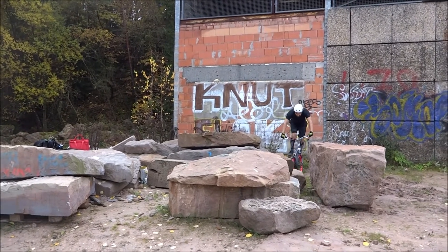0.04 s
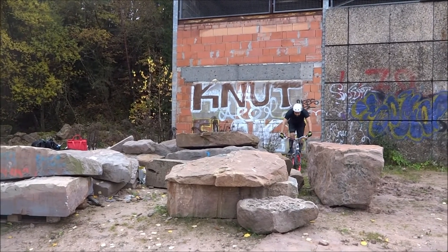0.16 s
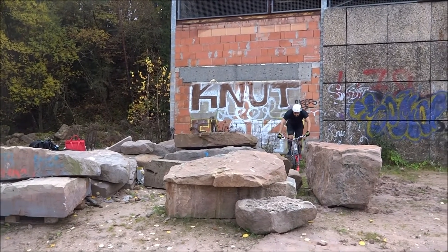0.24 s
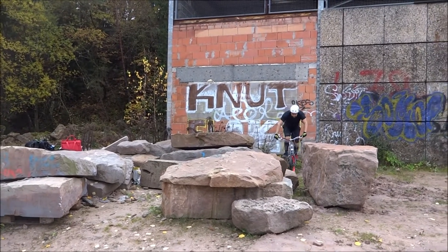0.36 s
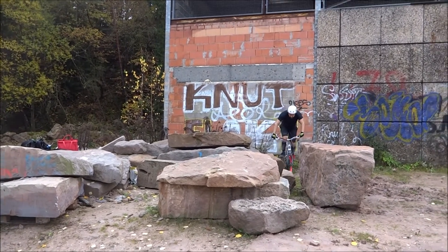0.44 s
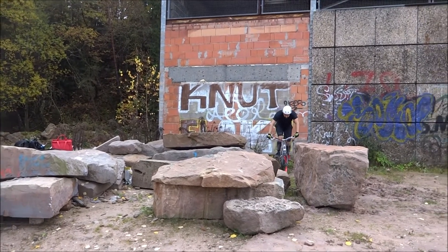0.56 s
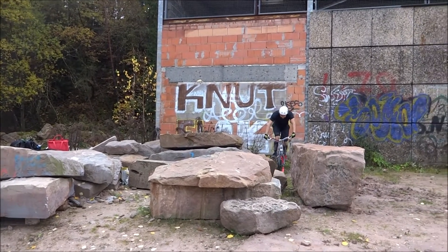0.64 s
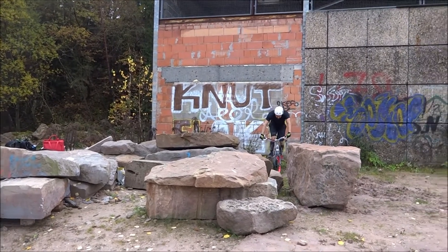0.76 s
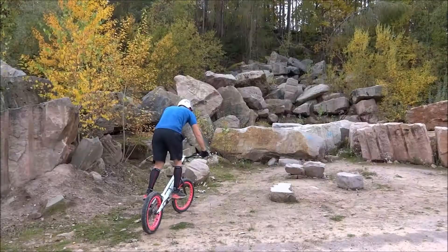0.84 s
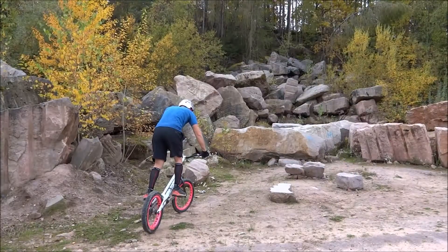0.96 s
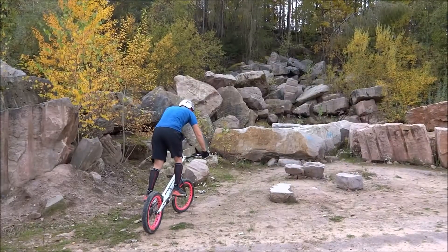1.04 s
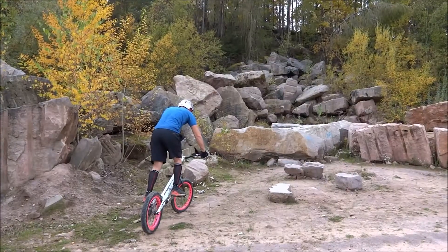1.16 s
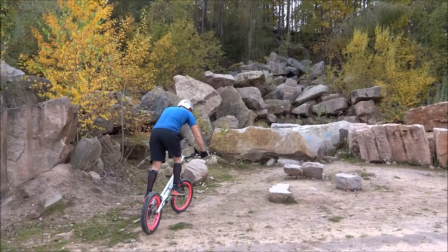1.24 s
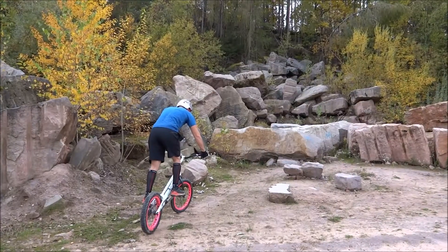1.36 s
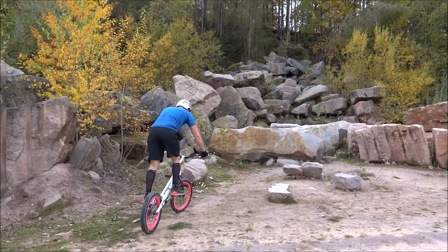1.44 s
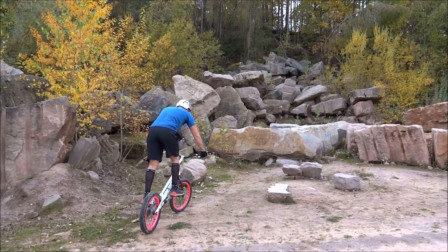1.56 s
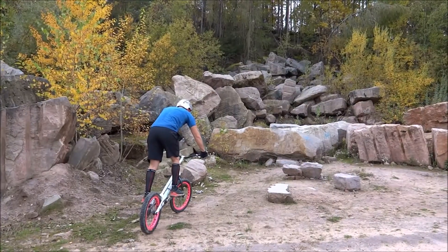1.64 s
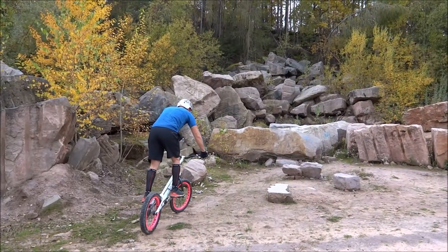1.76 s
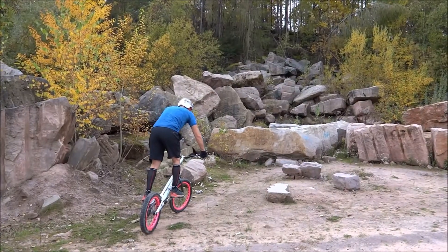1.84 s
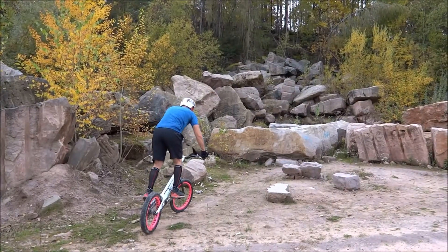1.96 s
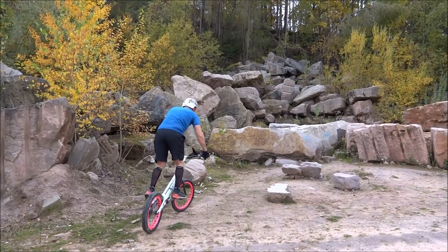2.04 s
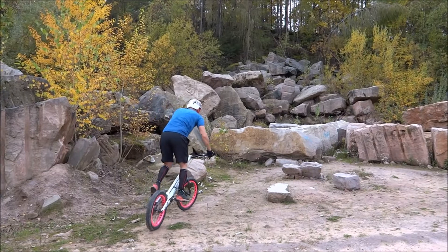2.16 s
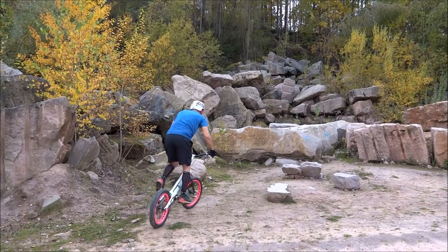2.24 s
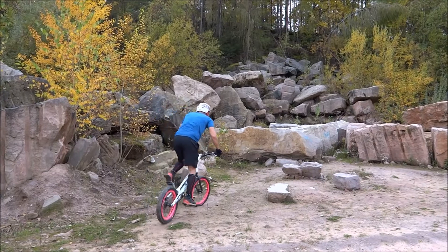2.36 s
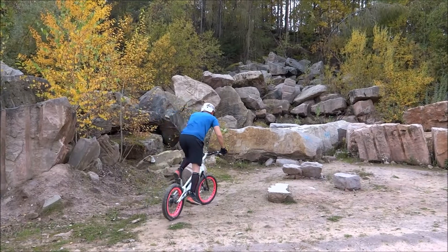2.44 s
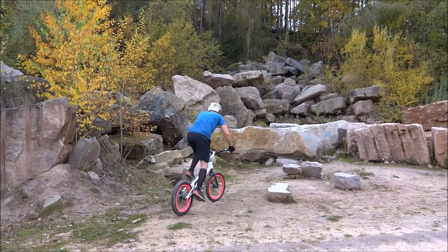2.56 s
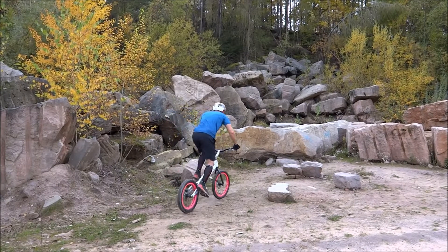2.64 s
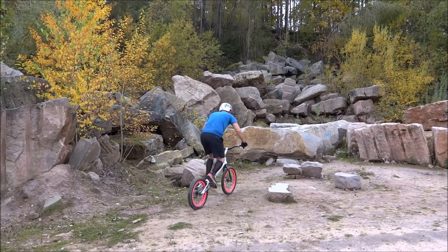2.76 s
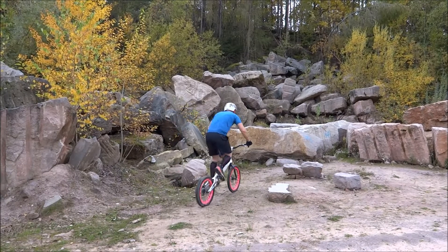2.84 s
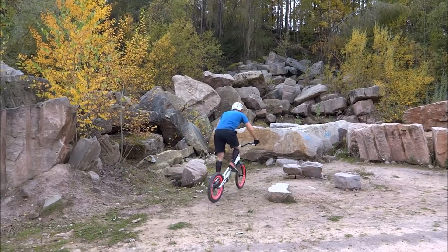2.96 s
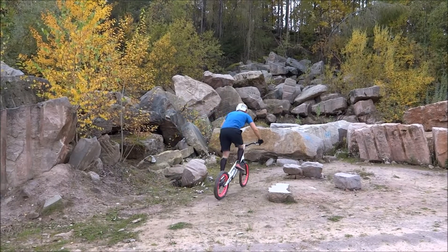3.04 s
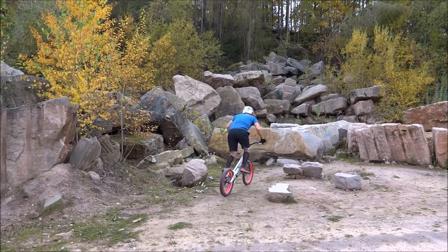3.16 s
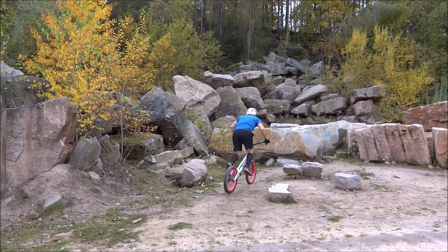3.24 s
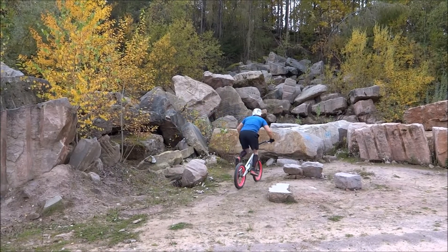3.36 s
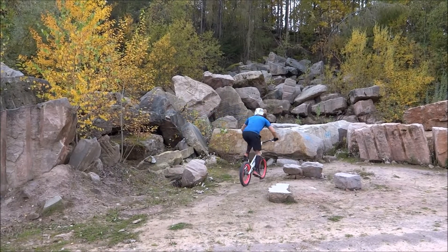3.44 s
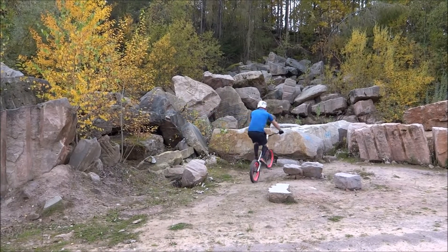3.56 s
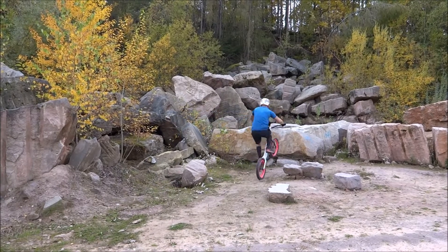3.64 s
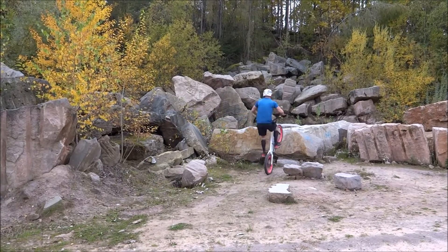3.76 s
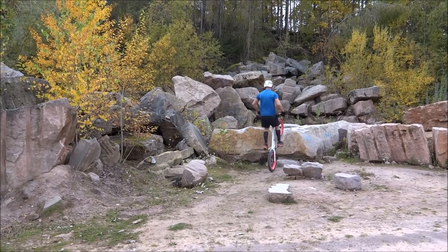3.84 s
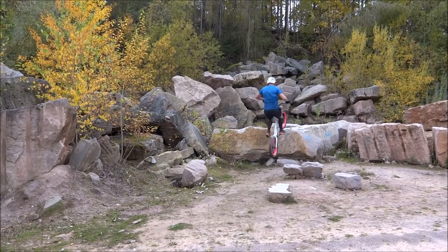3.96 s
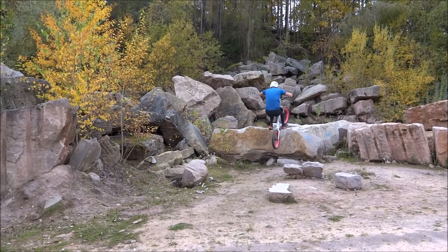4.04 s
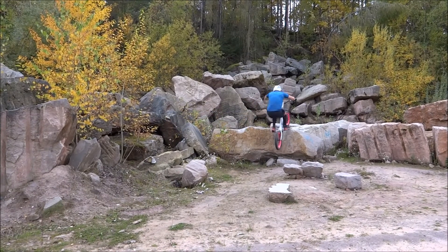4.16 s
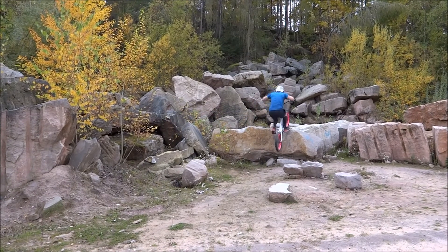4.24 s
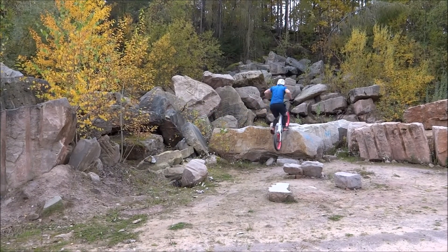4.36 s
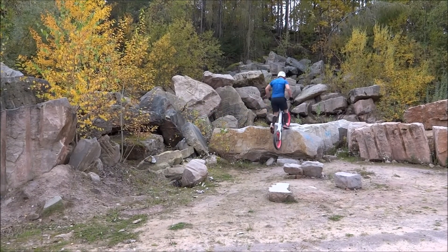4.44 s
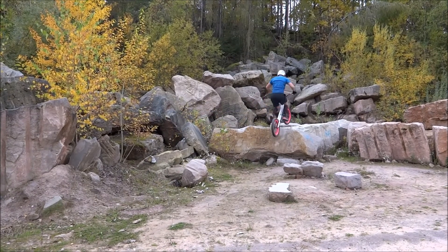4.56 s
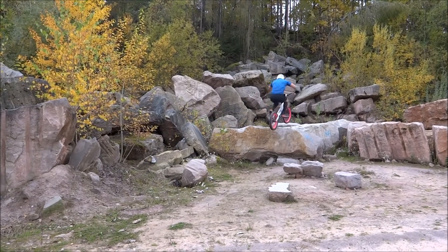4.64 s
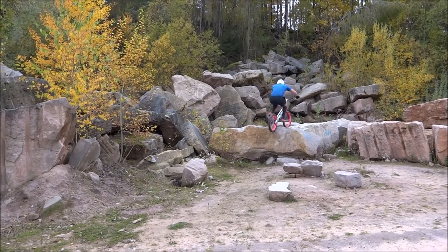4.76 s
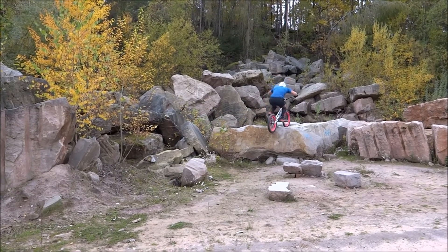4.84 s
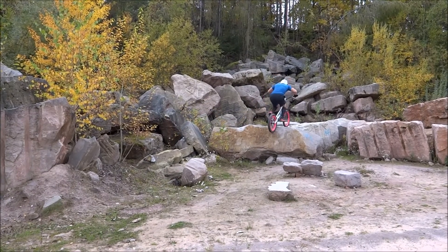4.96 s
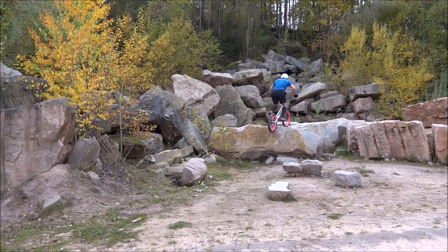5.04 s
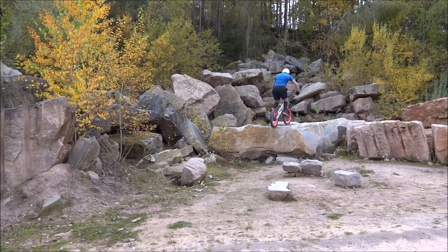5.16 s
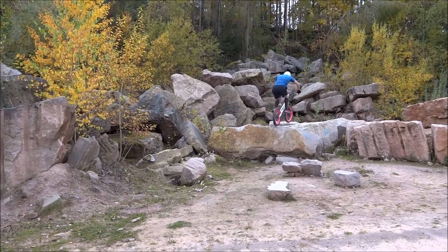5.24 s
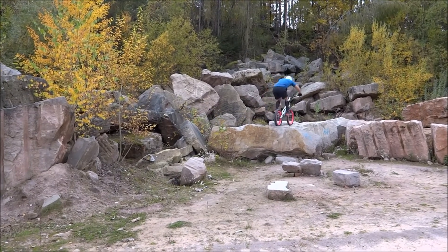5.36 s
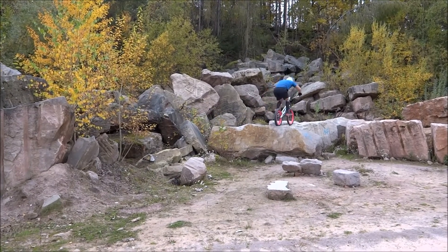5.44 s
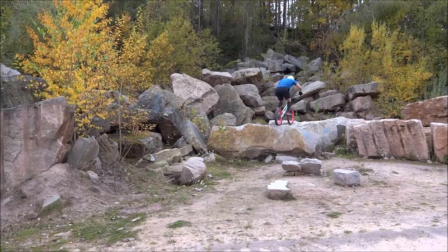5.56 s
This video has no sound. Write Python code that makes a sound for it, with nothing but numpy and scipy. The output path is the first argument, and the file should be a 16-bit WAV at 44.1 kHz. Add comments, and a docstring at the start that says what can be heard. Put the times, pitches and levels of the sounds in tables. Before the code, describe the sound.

Outdoors among rock faces, a trials bike balances with faint grit and sharp, bright freewheel clicks. It rolls off with crunching, hissing tyres, a few light knocks and a ratcheting buzz, then hits a stone block in a dense, loud clatter with low thuds. Two smaller landings follow with scuffs and clicks. Close stereo microphone, light wind, short stony echo.

```python
"""Trials bicycle in a quarry

Close in front of a stereo microphone a bike balances, rolls over grit and hops onto a stone block. Pawls tick
in the hub, frame and chain knock: swarms of tiny contacts ringing resonances. Tyres crunch and hiss as coloured
grains over a low noise rumble, and thud as decaying low sines; a brief hum is a gliding sine. Light wind and
far rumble are shaped noise; the rock faces return a short wash, the microphone housing cuts a row of dips."""
import sys
import numpy as np
from scipy import signal
from scipy.fft import rfft, irfft, next_fast_len
from scipy.io import wavfile

SR = 44100
rng = np.random.default_rng(int(sys.argv[2]) if len(sys.argv) > 2 else 0)


def makeup_ratio(level_db):
    """Linear amplitude ratio for a level in decibels (20 dB per factor of ten)."""
    decades = np.asarray(level_db, float) / 20
    return 10 ** decades


def transcribe(u):
    """Save the signal u as a 16-bit wav file named by the first command-line argument.

    u: samples, shape (n,) or (channels, n), limited to [-1, 1]; the rate is SR.
    q: integer samples, one column per channel.
    """
    v = np.clip(np.atleast_2d(u).T, -1, 1)
    q = np.round(v * 32767).astype(np.int16)
    wavfile.write(sys.argv[1], SR, q)


N = 247401
PADDED = next_fast_len(N + SR)   # room for echoes to end

# wind buffeting the bass: (time [s], level [dB])
WIND = [(0.0, -47), (1.2, -55), (3.1, -56.5), (3.34, -48), (4.48, -54.5), (4.92, -49.5), (5.61, -58)]
# far rumble and leaves: (frequency [Hz], density [dB per Hz])
AIR = [(15, -44), (25, -3), (137, -11), (166, -12), (195, -20), (373, -10.5), (988, -12.5), (1230, -14),
       (2000, -16.5), (2480, -22.5), (4030, -25.5), (16000, -42)]
AIR_DB = -44
# how alike the air is left and right: (frequency [Hz], correlation [0 to 1])
LIKENESS = [(60, 1), (180, 0.5), (550, 0), (4970, 0), (15000, 0.91)]

# thrum of the tyre knobs: (frequency [Hz], density [dB per Hz])
THRUM = [(350, -9.5), (600, -4), (900, 5.5), (1500, -2.5), (2300, -4), (3500, -36)]
# grit cracking under the knobs: (frequency [Hz], density [dB per Hz])
CRUNCH = [(900, -7), (1500, -2.5), (2100, 3), (2500, 3.5), (2900, 2.5), (3400, -0.5), (4500, -8.5),
          (7000, -5.5), (10000, -21.5)]
# hiss of fine sand: (frequency [Hz], density [dB per Hz])
SAND = [(2500, -15), (4000, 7), (5500, 5.5), (6500, 3), (7500, 0), (12000, -3), (16000, -10.5)]
# colour of the low rumble: (frequency [Hz], density [dB per Hz])
RUMBLE = [(70, -8), (135, 1), (200, -2.5), (285, -1.5), (400, -2), (650, -2), (1000, -32)]
# low rumble, fairly steady until 0.85 s, later from the rolling and landing tyres: (time [s], level [dB])
RUMBLE_LEVEL = [(0, -44.5), (0.2, -50), (0.3, -42.5), (0.45, -46), (0.84, -47), (0.86, -57), (1.4, -71),
                (2.4, -71), (2.55, -51.5), (2.95, -46.5), (3.15, -51.5), (3.36, -47), (3.46, -42.5),
                (3.7, -33), (3.9, -44), (4.07, -59), (4.2, -38), (4.46, -51), (4.75, -62), (4.84, -47),
                (5.6, -55)]
# run-up over grit, following speed and load: (time [s], crunch level [dB], sand relative to crunch [dB])
ROLL = [(1.8, -62, -26), (2.05, -48, -6), (2.15, -37.5, -6.5), (2.3, -32, -3), (2.42, -38.5, 1),
        (2.55, -42.5, 2.5), (2.68, -38, 1), (2.86, -30, 0), (2.97, -39.5, 3), (3.15, -40.5, 4.5),
        (3.25, -31.5, -4.5), (3.31, -40, 5), (3.52, -35.5, 2), (3.62, -38, 6), (3.8, -33, -0.5),
        (3.86, -37.5, 5), (3.9, -41, -11), (4.03, -35.5, -2), (4.1, -58, -8)]
ROLL_THRUM_DB = -6   # relative to the crunch
# a tyre slips on loose grit while balancing or after a hop:
# (time [s], crunch level [dB], fall [ms], sand relative to crunch [dB], thrum relative to crunch [dB])
SLIPS = [(0.058, -50.5, 49, 5.5, 5), (0.28, -57, 45, 7, 13.5), (0.848, -49.5, 200, 1, -2),
         (1.06, -47.5, 180, -4, -17), (1.42, -49, 61, -2.5, -23), (4.04, -38, 76, -9, -5),
         (4.27, -45, 100, 4.5, 3), (4.42, -43, 50, 7, 5), (4.8, -35, 93, -2, 0.5),
         (5.07, -48.5, 160, 1, -2), (5.32, -38.5, 96, -0.5, -3)]
SLIP_RISE_MS = 6.7
RESTING_THRUM_DB, RESTING_DB, RESTING_SAND_DB = -65, -83.5, -67.5   # tyres barely moving

# single pawl clicks: (time [s], nominal peak [dB])
PAWLS = [(0.0702, -41), (0.099, -24.5), (0.1252, -16.5), (0.1334, -15.5), (0.9614, -10.5), (0.965, -9),
         (0.995, -18), (1.0004, -7.5), (1.0175, -25), (1.149, -12.5), (1.158, -12), (1.1656, -10),
         (1.2513, -15), (1.2587, -14), (1.2759, -10.5), (1.4187, -17), (1.803, -35), (1.88, -32.5),
         (3.769, -6.5), (3.784, -6), (4.364, -15.5), (5.0275, -17), (5.3308, -5), (5.3418, -15),
         (5.358, -11.5)]
# the freewheel spins:
# (first click [s], last click [s], nominal peak [dB], gap stretch at start [ratio], gap stretch at end [ratio])
SPINS = [(3.3164, 3.392, -6.5, 0.6, 0.43), (3.9132, 4.054, -7.5, 0.55, 1.1),
         (5.1792, 5.2826, -9, 0.3, 0.54)]
# clicks in each spin: one [count] per spin
SPIN_TEETH = [5, 18, 7]
PAWL_RISE_MS, PAWL_FALL_MS, PAWL_SCATTER_DB = 1, 2.65, 1
# resonances of the hub shell: (frequency [Hz], width [Hz], level [dB])
HUB = [(4490, 450, 9.5), (4940, 330, 11.5), (5480, 120, -1), (6710, 310, 9), (6540, 660, -0.5),
       (8580, 800, -1), (8650, 3500, 0), (10900, 1000, -22), (12470, 380, 7), (11100, 990, -38),
       (13400, 170, -29), (15100, 200, -28.5)]

# frame and rim knocks: (time [s], nominal peak [dB], rise [ms], fall [ms], strongest pitch [Hz])
KNOCKS = [(0.283, -28, 5.3, 6, 690), (0.29, -56, 2.5, 1.9, 635), (1.065, -41, 5.5, 14, 1420),
          (1.934, -25.5, 2.1, 5.7, 1500), (2.907, -16.5, 1.3, 11.5, 775), (3.081, -19, 2.8, 2.5, 2700),
          (3.697, -17.5, 2.1, 3.9, 3800), (3.751, -21, 7.3, 5.7, 760), (3.906, -19, 4.5, 2.8, 1150),
          (4.146, -5, 0.58, 5.8, 3080), (4.156, 2, 0.97, 2.4, 3250), (4.181, -2, 3.6, 2.2, 3640),
          (4.185, 2.5, 5.6, 4.1, 1440), (4.207, 0, 6.8, 3.8, 1420), (4.242, -16, 0.8, 12, 780),
          (4.257, -3, 5.6, 6.5, 1960), (4.472, -18, 11.3, 13.6, 1420), (4.552, -20, 0.73, 1.8, 1140),
          (4.764, -9.5, 1.1, 3.5, 870), (4.776, -2, 1.6, 1.7, 3400), (4.794, -2.5, 7.8, 6.1, 1130),
          (5.045, -14, 2.6, 6.4, 1290), (5.16, -28.5, 1.9, 3, 1300), (5.31, -10.5, 5.6, 4.9, 840),
          (5.331, -23, 2.4, 9.5, 800)]
# chain slaps and tyre scuffs, mostly unpitched: (time [s], nominal peak [dB], rise [ms], fall [ms])
SCUFFS = [(0.853, -33.5, 1.5, 5.9), (2.815, -20, 7.6, 13), (2.838, -17, 0.34, 7.6), (2.905, -12, 0.26, 2.2),
          (3.21, -20.5, 14, 21), (3.332, -21, 6.6, 27), (3.612, -25, 4.5, 26), (4.087, -20, 3.6, 2.4),
          (4.165, -14, 1, 18), (4.383, -19.5, 3.2, 51), (4.406, -12, 7.4, 14.4), (4.43, -13, 2, 1.6),
          (4.488, -21, 2.5, 4.2), (5.066, -21, 5.9, 4), (5.314, -9, 7.6, 7.6), (5.401, -20.5, 1.9, 7)]
# resonances of frame tubes and rims: (frequency [Hz], width [Hz], level [dB])
FRAME = [(636, 47, 4), (845, 92, 7.5), (1293, 250, 6), (1420, 200, 11.5), (1500, 380, 6), (2030, 72, 6.5),
         (3000, 130, 1), (3080, 130, -15), (3310, 590, 7.5), (3800, 83, -5), (4500, 33, -27),
         (5140, 220, -12)]
KNOCK_RATTLE_DB, RATTLE_PER_DB = -4.5, 0.9   # rattle of a 0 dB knock; lighter knocks rattle less
SCUFF_RATTLE_DB, SCUFF_HZ = 12, 2700

# tyres taking the rider's weight: (time [s], nominal peak [dB], pitch [Hz])
THUDS = [(0.283, -31.5, 140), (0.821, -30.5, 111), (2.819, -30.5, 288), (2.903, -28, 275),
         (3.753, -39, 113), (4.143, -16, 296.5), (4.15, -19.5, 163), (4.184, -21, 264), (4.209, -18, 281),
         (4.262, -22, 139), (4.761, -23.5, 144), (4.767, -26, 303), (4.797, -20.5, 133), (5.319, -33, 279),
         (5.398, -29.5, 134)]
THUD_T60_S, PUSH_HZ = 0.11, 67

# a short hum as the rider first loads the pedal: (time [s], pitch [Hz], level [dB])
HUM = [(2.18, 466, -49), (2.242, 418, -38.5), (2.32, 480, -48)]

# the direct sound starts near the middle, jumps left and drifts back: (time [s], left minus right [dB])
LEAN = [(0, -.3), (.84, -.3), (.86, 1.3), (2.3, 1.1), (3.6, 0), (5.61, -.2)]
# colour of the wash from the rocks: (frequency [Hz], gain [dB])
ROCK_COLOUR = [(60, -19), (150, -9.5), (350, 8.5), (1000, -5.5), (3000, -0.5), (8000, -4), (15000, -10.5)]
ROCK_ECHO_DB, ROCK_T60_S = -11.5, 0.078
# dips where sound scattered by the housing cancels itself: (frequency [Hz], width [Hz], share removed [0 to 1])
HOUSING = [(480, 300, 0.68), (1027, 260, 0.66), (1730, 260, 0.68), (2435, 380, 0.72), (3150, 160, 0.3),
           (3600, 135, 0.25), (4146, 200, 0.55), (5150, 250, 0.45), (6050, 220, .35), (6850, 490, 0.5),
           (7800, 300, 0.3)]
CUTOFF_HZ = 15550


def rms_one(x):
    """Scale to rms 1."""
    return x / np.sqrt(np.mean(x ** 2) + 1e-20)


def in_time(rows):
    """Columns of a curve table, one value per sample; the end values hold."""
    s, *columns = np.transpose(rows)
    return [np.interp(np.arange(N) / SR, s, c) for c in columns]


def at_hz(points, hz):
    """A spectrum table read on a log frequency axis."""
    table_hz, values = np.transpose(points)
    return np.interp(np.log(hz + 1), np.log(table_hz), values)


def colour(x, points):
    """Shape a steady sound by a spectrum, silent below half its lowest frequency; rms 1."""
    hz = np.fft.rfftfreq(PADDED, 1 / SR)
    gain = (hz > points[0][0] / 2) * makeup_ratio(at_hz(points, hz))
    return rms_one(irfft(rfft(x, PADDED) * gain, PADDED)[..., :N])


def drift(corner_hz):
    """Slow random wander of rms 1: noise through two equal poles, computed every 40 samples."""
    r = np.exp(-2 * np.pi * corner_hz * 40 / SR)
    noise = rng.standard_normal(N // 40 + 2002)
    slow = signal.lfilter([1], [1, -2 * r, r * r], noise)[2000:]   # skip the filter's start
    return np.interp(np.arange(N) / 40, np.arange(len(slow)), rms_one(slow))


def grains(count, per_s, spread_db):
    """Random clicks of uneven size and sign, over count samples."""
    born = rng.random(count) < per_s / SR
    size_db = spread_db * np.minimum(rng.exponential(1, count), 5)
    return born * makeup_ratio(size_db) * rng.choice([-1, 1], count)


def strikes(rows, modes, reach_octaves, scatter_db, per_s, rattle_hz, crest_db, linger_db, linger_ms):
    """Each strike is a swarm of tiny contacts that swells and dies, ringing the modes near its strongest pitch."""
    size = 8192
    out = np.zeros(N + size)
    ms = np.arange(size) / SR * 1000
    hz = np.fft.rfftfreq(size, 1 / SR)
    centre, width, mode_db = np.transpose(modes)[:, :, None]
    rings = 1j * hz * width / (centre ** 2 - hz ** 2 + 1j * hz * width)
    rings *= (-1) ** np.arange(len(modes))[:, None]   # alternate modes in opposite phase
    # the broad, unpitched part of a contact
    low, high = 1j * hz / rattle_hz[0], 1j * hz / rattle_hz[1]
    rattle = (low / (1 + low)) ** 3 / (1 + high) ** 1.9
    for s, peak_db, rise, fall, best_hz, rattle_db in rows:
        rise, fall = max(rise, .1), max(fall, .5)
        after = np.maximum(ms - rise, 0)
        rising = np.minimum(ms / rise, 1) ** 1.2
        swell = rising * np.exp(-after / fall)
        shaking = rising * makeup_ratio(linger_db) * np.exp(-after / linger_ms)   # loose parts rattle on, unpitched
        # modes far from the strongest pitch stay weak
        far = np.log2(centre / best_hz) / reach_octaves
        nearness_db = -6 * np.minimum(far ** 2, 3)
        strength = makeup_ratio(mode_db + nearness_db + scatter_db * rng.standard_normal(centre.shape))
        pitched = np.sum(strength * rings, axis=0)
        pitched /= np.sqrt(np.sum(abs(pitched) ** 2) / np.sum(abs(rattle) ** 2))   # as strong as the rattle
        body = pitched + makeup_ratio(rattle_db) * rattle
        contacts = grains(size, per_s, 1.88)
        sound = irfft(rfft(swell * contacts) * body + rfft(shaking * contacts) * rattle, size)
        sound *= makeup_ratio(peak_db - crest_db) * np.sqrt(np.sum(swell ** 2) / np.sum(sound ** 2))
        at = round(s * SR)
        out[at:at + size] += sound
    return out[:N]


def air():
    """Far rumble and leaves, alike left and right in bass and top, unlike between; wind buffets the bass."""
    alike = at_hz(LIKENESS, np.fft.rfftfreq(PADDED, 1 / SR))
    mid, side = rfft(rng.standard_normal((2, N)), PADDED)
    spectra = np.sqrt(1 + alike) * mid + np.sqrt(1 - alike) * side * [[1], [-1]]
    pair = irfft(spectra, PADDED)[:, :N]
    gusts = colour(rng.standard_normal(N), [(22, 5.5), (45, 13.5), (80, 7), (160, -37.0)])
    wind = makeup_ratio(in_time(WIND)[0] + 1.7 * drift(1.8)) * gusts
    return makeup_ratio(AIR_DB) * colour(pair, AIR) + wind


def grit_gains():
    """Gains of thrum, crunch and sand: at rest, plus the run-up, plus each slip."""
    roll_db, sand_db = in_time(ROLL)
    gains = makeup_ratio([roll_db + ROLL_THRUM_DB, roll_db, roll_db + sand_db])
    gains += makeup_ratio([[RESTING_THRUM_DB], [RESTING_DB], [RESTING_SAND_DB]])
    for s, crunch_db, fall, sand_db, thrum_db in SLIPS:
        ms = (np.arange(N) / SR - s) * 1000
        swell = np.clip(ms / SLIP_RISE_MS, 0, 1) * np.exp(-np.maximum(ms - SLIP_RISE_MS, 0) / fall)
        gains += makeup_ratio(crunch_db + np.array([[thrum_db], [0], [sand_db]])) * swell
    return gains


def tyres_and_rumble():
    """Knobs thrum and grit cracks in clumps under them, sand hisses; a low noise rumble lies beneath."""
    thrum, crunch, sand = grit_gains()
    clumps = drift(27)   # shared, so the layers swell together
    thrum = thrum * makeup_ratio(0.21 * clumps + 2.0 * drift(25)) * colour(grains(N, 3000, 3.3), THRUM)
    crunch = crunch * makeup_ratio(1.2 * clumps + 0.4 * drift(54)) * colour(grains(N, 4500, 2.9), CRUNCH)
    sand = sand * makeup_ratio(1.8 * clumps + 0.35 * drift(56)) * colour(grains(N, 12000, 0.3), SAND)
    rumble_db = in_time(RUMBLE_LEVEL)[0] + 0.7 * clumps + 2.0 * drift(17)
    rumble = makeup_ratio(rumble_db) * colour(rng.standard_normal(N), RUMBLE)
    return thrum + crunch + sand + rumble


def spin_clicks():
    """Teeth pass quickest mid-way, with gaps that stretch towards both ends of a spin."""
    rows = []
    for (first, last, peak_db, drag_in, drag_out), teeth in zip(SPINS, SPIN_TEETH):
        u = (np.arange(teeth - 1) + .5) / (teeth - 1)
        gaps = 1 + drag_in * (1 - u) ** 3 + drag_out * u ** 3
        passed = np.cumsum(np.r_[0, gaps])
        times = first + (last - first) * passed / passed[-1]
        rows += zip(times, peak_db + PAWL_SCATTER_DB * rng.standard_normal(teeth))
    return rows


def freewheel():
    """Each pawl click is a few ms of contacts that ring the hub shell."""
    rows = [(s, peak_db, PAWL_RISE_MS, PAWL_FALL_MS, 6200, 1.0) for s, peak_db in PAWLS + spin_clicks()]
    return strikes(rows, HUB, reach_octaves=0.35, scatter_db=3.0, per_s=16000, rattle_hz=(3000, 18000),
                   crest_db=7.5, linger_db=-13, linger_ms=27.4)


def frame():
    """Knocks ring the tubes inside a broad crunch of chain, rubber and stone; scuffs are mostly crunch."""
    knocks = [(*row, KNOCK_RATTLE_DB + RATTLE_PER_DB * row[1]) for row in KNOCKS]
    scuffs = [(*row, SCUFF_HZ, SCUFF_RATTLE_DB) for row in SCUFFS]
    return strikes(knocks + scuffs, FRAME, reach_octaves=0.5, scatter_db=2.5, per_s=18000,
                   rattle_hz=(500, 3500), crest_db=5.0, linger_db=-16.0, linger_ms=30.7)


def thuds():
    """The tyre squashes: a low ring with a rough, lumpy edge, over a slow push of air."""
    out = np.zeros(N + SR)
    t = np.arange(SR // 2) / SR
    shape = (1 - np.exp(-t / 0.0098)) * makeup_ratio(-60 * t / THUD_T60_S)
    push = 0.55 * np.sin(2 * np.pi * PUSH_HZ * t)
    lumps = signal.butter(2, [60, 420], "band", fs=SR, output="sos")
    for s, peak_db, hz in THUDS:
        rough = 0.68 * rms_one(signal.sosfilt(lumps, rng.standard_normal(len(t))))
        ring = np.sin(2 * np.pi * hz * t)
        at = round(s * SR)
        out[at:at + len(t)] += makeup_ratio(peak_db + 2.0) * shape * (ring + rough + push)
    return out[:N]


def hum():
    """A sine of gliding pitch that comes and goes."""
    hz, level_db = in_time(HUM)
    t = np.arange(N) / SR
    fade = np.clip(np.minimum(t - HUM[0][0], HUM[-1][0] - t) / .02, 0, 1)
    return np.sqrt(2) * fade * makeup_ratio(level_db) * np.sin(2 * np.pi * np.cumsum(hz) / SR)


def rocks(x):
    """Scattered returns from the blocks: decaying noise, different on each side, fullest in the low mids."""
    t = np.arange(SR // 2) / SR
    wash = rng.standard_normal((2, len(t))) * makeup_ratio(-60 * t / ROCK_T60_S) * np.minimum(t / 0.00055, 1)
    wash /= np.sqrt(np.sum(wash ** 2, axis=1, keepdims=True))
    gain = makeup_ratio(ROCK_ECHO_DB + at_hz(ROCK_COLOUR, np.fft.rfftfreq(PADDED, 1 / SR)))
    return irfft(rfft(x, PADDED) * rfft(wash, PADDED) * gain, PADDED)[:, :N]


def housing(x):
    """The microphone's own colour: a row of resonant dips, with 2 dB of overall gain."""
    hz = np.fft.rfftfreq(PADDED, 1 / SR)
    response = makeup_ratio(2.0)
    for centre, width, share in HOUSING:
        response = response * (1 - share * 1j * hz * width / (centre ** 2 - hz ** 2 + 1j * hz * width))
    return irfft(rfft(x, PADDED) * response, PADDED)[:, :N]


def scene():
    """The bike and low rumble ahead, leaning a little to one side, in rock echoes and open air."""
    ahead = freewheel() + frame() + thuds() + tyres_and_rumble() + hum()
    direct = ahead * makeup_ratio(in_time(LEAN)[0] * [[.5], [-.5]])
    return direct + rocks(ahead) + air()


def band_limit(x):
    """A steep low-pass at the top of the band."""
    return signal.sosfilt(signal.butter(12, 16800, fs=SR, output="sos"), x)


def record(dry):
    """Housing colour, then the loudest knocks rounded off and the top cut."""
    rounded = 1.011 * np.tanh(housing(dry) / 1.205)
    top_cut = signal.cheby2(10, 27, CUTOFF_HZ, fs=SR, output="sos")
    mix = signal.sosfilt(top_cut, rounded)
    return band_limit(mix)


dry = scene()
out = record(dry)
transcribe(out)
```